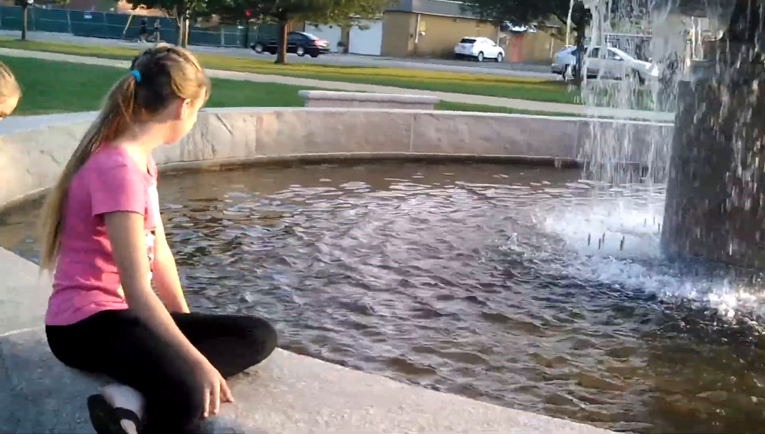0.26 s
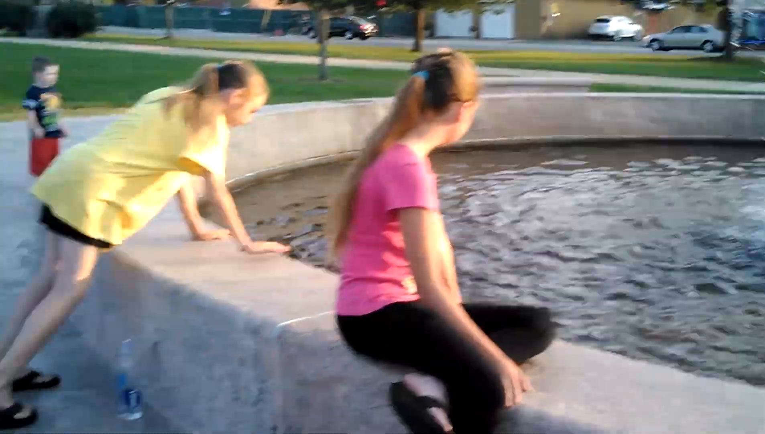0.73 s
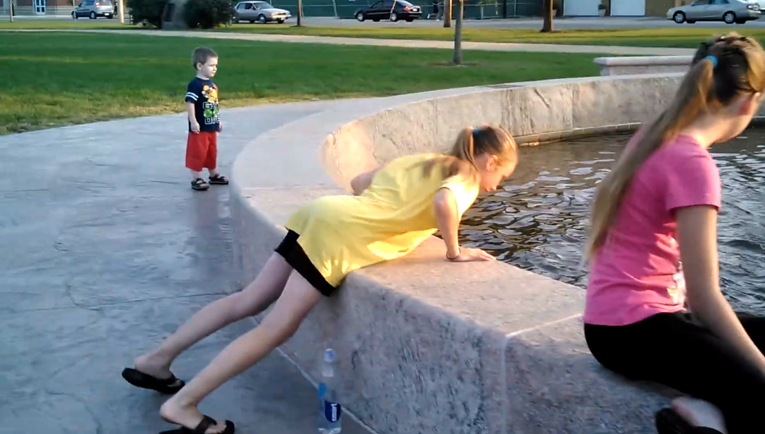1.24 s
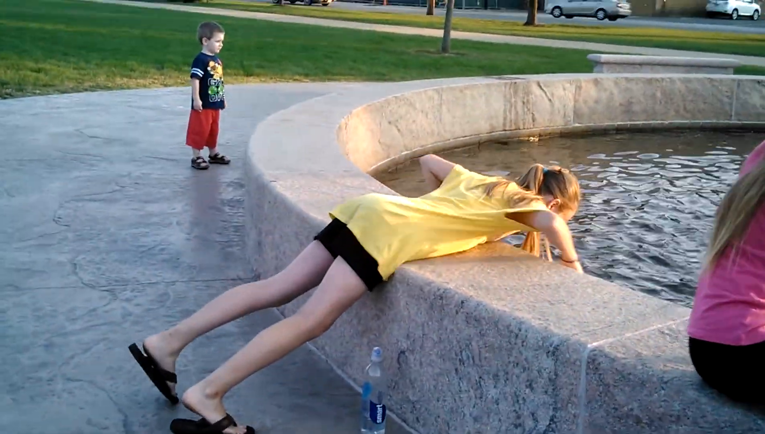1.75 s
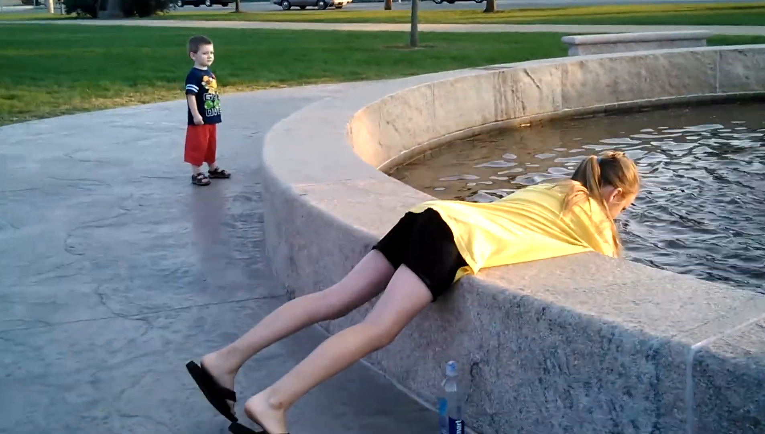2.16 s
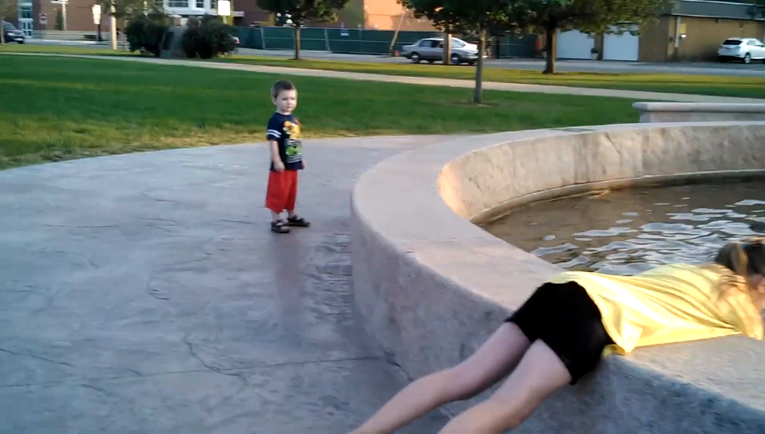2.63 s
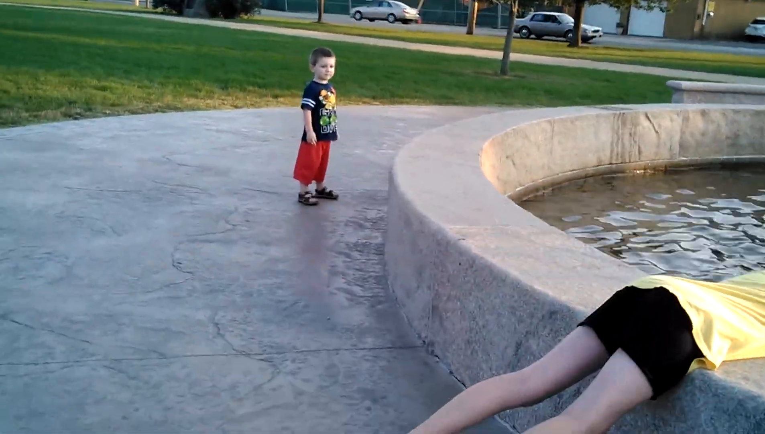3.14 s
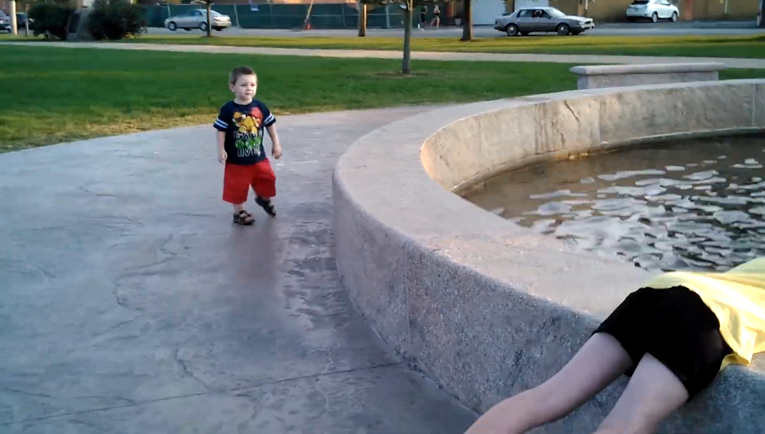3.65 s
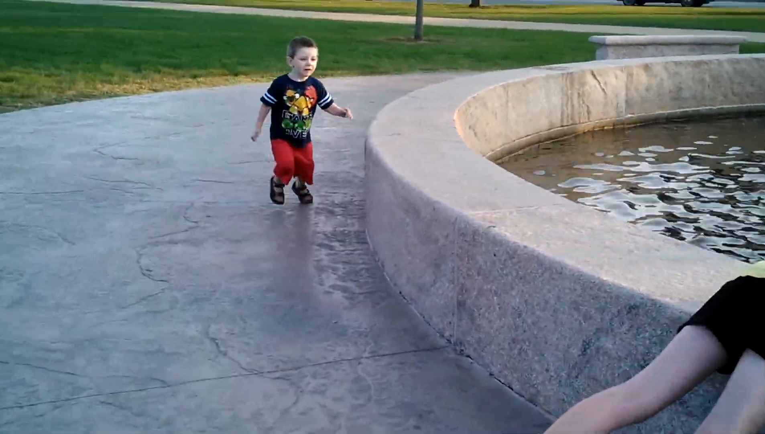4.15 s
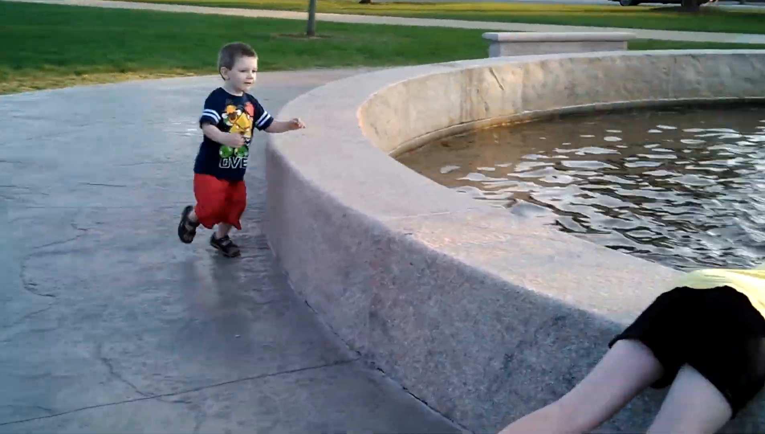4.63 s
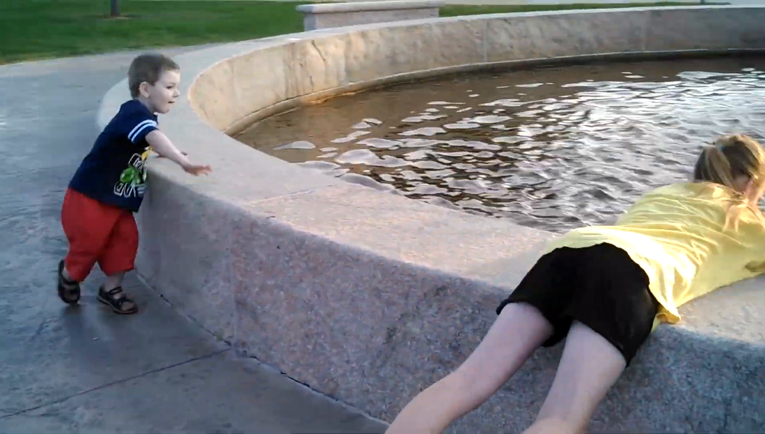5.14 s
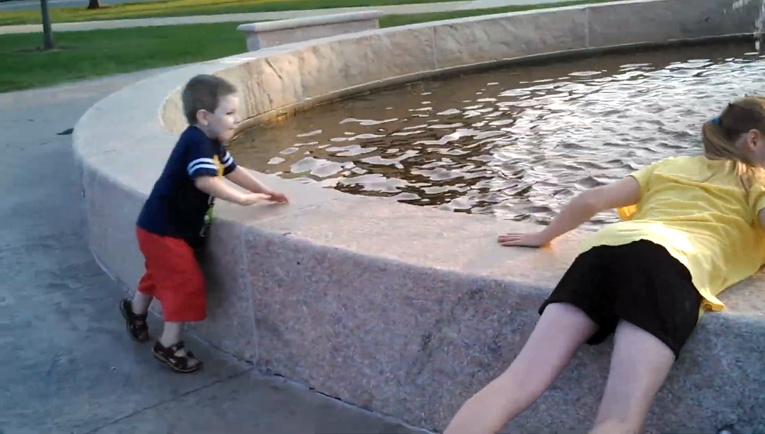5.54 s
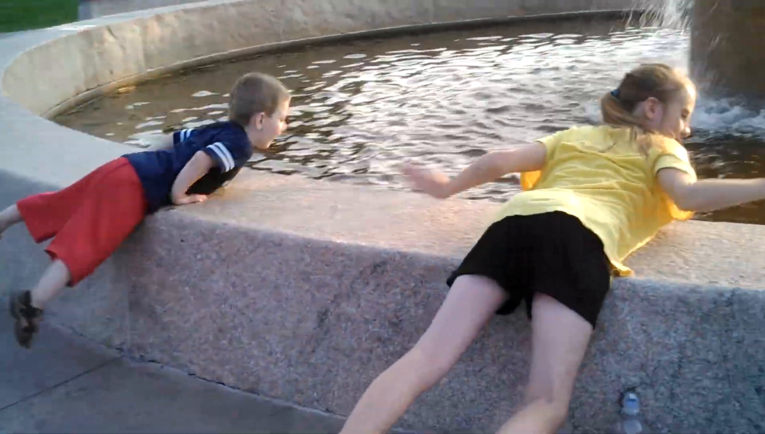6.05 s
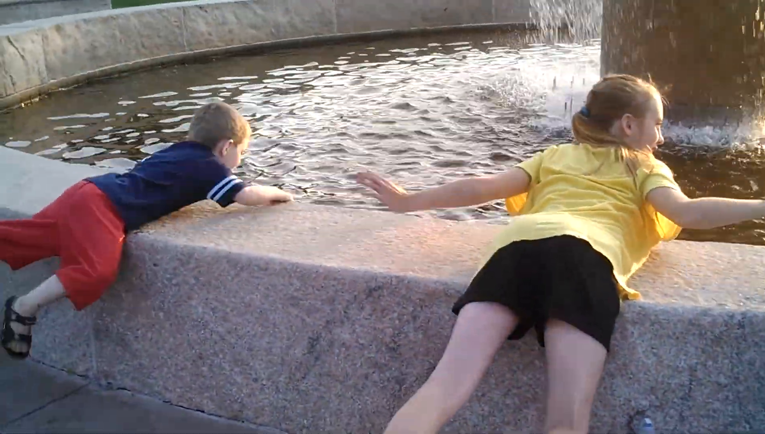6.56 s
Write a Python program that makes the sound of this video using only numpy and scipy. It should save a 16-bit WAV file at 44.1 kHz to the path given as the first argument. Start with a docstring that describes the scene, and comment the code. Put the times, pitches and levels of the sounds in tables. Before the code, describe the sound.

A park fountain splashes without pause into a stone basin a few metres away, in open air. The rush is bright and hissy, peaking around 6 kHz, made of dense noise with fine fizz, patter and faint gurgling. From 0 to 2 s it is full, with short rising plops near 0.1, 0.2, 0.6 and 0.8 s, a small tick at 0.6 and a low wind bump at the very start. Around 2.1 s come more tiny drops and a faint tick. From 2.3 to 4 s the water drops a few decibels as the microphone turns away; wind buffets it in low lumps, strongest with flutter at 2.8-3 s, with further throbs to 4.7 s. The splash grows again, fullest near 5.2 s and at the end. Sharp dry clicks strike at 5.5 s and, as a loud pair, at 6.2 s; drops cluster near 6.4-6.5 s. Mostly mono, treble flickering sideways.

```python
"""Park fountain in a breeze

Sheets of water fall into a stone basin a few metres off: noise and swarms of damped, rising sines merge into a rush.
A few near drops plop as single bubbles; filtered clicks tick. Filtered noise in lumps is a breeze buffeting
the single microphone, whose port rings near 6 kHz. The treble flickers between the ears as bands swap for hiss.
"""
import sys
import numpy as np
from scipy import signal
from scipy.fft import rfft, irfft, next_fast_len
from scipy.io import wavfile
from scipy.ndimage import uniform_filter1d, map_coordinates

SR = 44100
rng = np.random.default_rng(int(sys.argv[2]) if len(sys.argv) > 2 else 0)


def invert_db(level):
    """Linear amplitude ratio for a level in decibels (20 dB per decade), elementwise."""
    return 10 ** (np.asarray(level, dtype=float) / 20)


def put_to_file(sound):
    """Save the sound as 16-bit audio at rate SR, in the file named by the first command-line argument."""
    columns = np.atleast_2d(sound).T  # one column per channel
    safe = np.clip(columns, -1, 1)
    whole_steps = np.round(safe * 32767)
    wavfile.write(sys.argv[1], SR, whole_steps.astype(np.int16))


N = 299439


def unit(x):
    """Scaled to rms 1."""
    return x / np.sqrt(np.mean(np.abs(x) ** 2) + 1e-20)


def along(points, hz):
    """(Hz, value) points interpolated on a log frequency axis."""
    point_hz, value = np.transpose(points)
    return np.interp(np.log(hz + 1), np.log(point_hz + 1), value)


def curves(rows, t_s):
    """Each column after the time, read at times t_s."""
    row_s, *columns = np.transpose(rows)
    return [np.interp(t_s, row_s, column) for column in columns]


def wobble(rate_hz):
    """A smooth random curve with rate_hz knots a second."""
    knots = rng.standard_normal(N)
    return map_coordinates(knots, [np.arange(N) * rate_hz / SR])


def coloured(x, spectrum):
    """x through a causal minimum-phase filter with the given (Hz, dB) gain."""
    m = 2 * next_fast_len(N // 2 + 4096)
    gain = invert_db(along(spectrum, np.fft.rfftfreq(m, 1 / SR)))
    cepstrum = irfft(np.log(gain + 1e-6), m)
    # fold onto positive time
    cepstrum[1:m // 2] *= 2
    cepstrum[m // 2 + 1:] = 0
    response = np.exp(rfft(cepstrum))
    return irfft(rfft(x, m) * response, m)[:N]


def bubbles(start_s, size, hz, cycles, rise):
    """Damped sines whose pitch climbs as each bubble nears the surface."""
    t_s = np.arange(600) / SR
    age = t_s * (hz / cycles)[:, None]  # in decay times
    tone = np.sin(2 * np.pi * hz[:, None] * t_s * (1 + rise * age))
    envelope = np.exp(-age) * (1 - np.exp(-4 * age))
    ring = tone * envelope * size[:, None]
    where = (start_s * SR).astype(int)[:, None] + np.arange(len(t_s))
    return np.bincount(where.ravel(), ring.ravel(), N + len(t_s))[:N]


def swarm(count, hz, octaves, cycles, spread_db, size=1):
    """Splashes of size bubbles at random moments: log-normal pitch, many small and a few large."""
    clump_s, clump_octaves = .012, 0.207  # scatter within a splash
    total = count * size
    splash_s = rng.random(count) * N / SR
    start_s = np.repeat(splash_s, size) + clump_s * rng.exponential(size=total)
    splash_octaves = octaves * rng.standard_normal(count)
    pitch_octaves = np.repeat(splash_octaves, size) + clump_octaves * rng.standard_normal(total)
    strength = invert_db(spread_db * np.minimum(rng.exponential(size=total), 4))
    pitch_hz = np.clip(hz * 2 ** pitch_octaves, 200, 16000)
    return unit(bubbles(start_s % (N / SR), strength, pitch_hz, cycles, rise=0.113))


def water():
    """Far splashes merge into patchy noise; nearer ones stand out as fizz, patter and gurgle."""
    # strength of the falling water: time_s, level_db
    splash = [(0, -11.5), (.7, -11), (1.3, -12.5), (2.15, -12), (2.45, -14.5), (3.0, -14), (3.8, -14.5),
              (4.4, -12.5), (4.95, -13), (5.25, -11.4), (5.8, -12), (6.15, -13), (6.79, -11.5)]
    # turning of the microphone: time_s, away from the jet (0-1), back towards it (0-1)
    facing = [(0, 0, .15), (.7, 0, .15), (1.4, .3, 0), (2.7, .6, 0), (3.4, 1, 0), (4.1, .7, 0),
              (4.8, .45, .1), (5.4, 0, .55), (6.1, .1, .85), (6.79, 0, 1)]
    # colour when turned away: freq_hz, gain_db
    away_colour = [(800, 1), (2000, .5), (3700, 1.5), (4600, 1), (6000, 0), (9000, 3.5), (11500, -.5),
                   (13500, 4)]
    # colour when turned back, nearer: freq_hz, gain_db
    back_colour = [(800, -1), (2000, -.5), (3000, -1.5), (3700, -4.5), (4500, 4), (6000, 0), (7500, -2.5),
                   (9000, -5.5), (11500, 2.5), (13500, 4)]
    # water heard through the microphone port: freq_hz, relative gain_db
    port = [(190, -46), (330, -23.5), (620, -18.5), (2500, -17), (3300, -20), (4050, -23), (4600, -17.5),
            (5400, -6), (6100, 2), (7000, -6.5), (9500, -18.5), (11600, -34.5), (13000, -23.5),
            (14200, -23.5)]

    # levels relative to the far noise
    fizz = invert_db(-11.5) * swarm(count=6000, hz=6010, octaves=0.689, cycles=1.73, spread_db=3)
    gurgle = invert_db(-15.5) * swarm(count=600, hz=1491.6, octaves=0.75, cycles=7, spread_db=1.5, size=4)
    patter = invert_db(-16) * swarm(count=1600, hz=2000, octaves=.4, cycles=.8, spread_db=2.5)
    far = rng.standard_normal(N)
    hz, at_s, z = signal.stft(far + fizz + gurgle + patter, SR, nperseg=512)

    patches = uniform_filter1d(rng.standard_normal(z.shape), size=19, axis=0)
    patches = uniform_filter1d(patches, size=5, axis=1)
    patch_db = 0.69 * unit(patches)
    away, back = curves(facing, at_s)
    turn_db = np.outer(along(away_colour, hz), away) + np.outer(along(back_colour, hz), back)
    rush = signal.istft(z * invert_db(turn_db + patch_db), SR, nperseg=512)[1][:N]

    surge_db = curves(splash, np.arange(N) / SR)[0] + 0.28 * wobble(24)
    return invert_db(surge_db) * unit(coloured(rush, port))


def breeze():
    """Eddies push the membrane in lumps; smaller, faster ones throb, and strong gusts flutter higher still."""
    # buffeting: time_s, strength_db, tilt from thump to throb (dB)
    gusts = [(0, -29, -6), (.13, -27.5, 7), (.18, -38, 0), (1.2, -36, -0.5), (1.58, -32, -8),
             (1.75, -39, 0), (2.05, -35.5, 4), (2.25, -25, -2), (2.62, -24.5, 3), (2.76, -17.5, 11.5),
             (2.96, -19.5, -1.5), (3.02, -27.5, -2), (3.28, -24, 0), (3.35, -34, -7), (3.46, -25.5, 2.5),
             (3.65, -27, -7), (3.75, -31.5, 0), (4.09, -25, 1), (4.15, -37, -5), (4.29, -26, 8),
             (4.43, -28.5, 21), (4.5, -39, -3), (4.58, -28, 2), (4.72, -39.5, -4), (5.5, -37.5, -1),
             (5.75, -33, -9.5), (6.25, -34.5, -3), (6.52, -27, 0), (6.64, -37.5, 0), (6.73, -28.5, -8)]
    # eddy spectra, largest to smallest: freq_hz, relative gain_db
    thump = [(20, -71), (35, -15), (52, -3), (75, 0), (100, -2), (140, -39), (300, -64)]
    throb = [(60, -43.5), (95, -0.5), (130, -2.5), (185, -7), (260, -33), (500, -68)]
    flutter = [(120, -29), (190, 2), (280, -0.5), (380, -7), (600, -22), (1000, -65.5)]
    thump_db, throb_db = -3.5, -4.5  # over the strength
    calm_db, grows_from_db, growth_db_per_db = -46.5, -30, 1.95  # flutter

    strength_db, tilt_db = curves(gusts, np.arange(N) / SR)
    levels_db = (
        strength_db + thump_db - tilt_db / 2,
        strength_db + throb_db + tilt_db / 2,
        calm_db + growth_db_per_db * np.maximum(strength_db - grows_from_db, 0),
    )
    shared_lumps_db = 1.83 * wobble(13)
    out = np.zeros(N)
    for level_db, spectrum in zip(levels_db, (thump, throb, flutter)):
        lumps_db = shared_lumps_db + 0.97 * wobble(18)
        eddies = unit(invert_db(lumps_db) * coloured(rng.standard_normal(N), spectrum))
        out += invert_db(level_db) * eddies
    return out


def drops():
    """The bubble under each near drop rings briefly, climbing in pitch."""
    # near drops: start_s, level_db, starting pitch_hz
    near_drops = [(0.092, -6, 1400), (0.113, -9, 1100), (0.198, -6, 935), (0.609, -6, 1290),
                  (0.613, -12, 2480), (0.82, -10, 1330), (2.025, -9, 1560), (2.109, -11, 1710),
                  (2.183, -11, 2150), (3.102, -10, 2250), (4.369, -8, 1370), (4.882, -10, 2250),
                  (5.249, -8, 1670), (6.179, -10, 1370), (6.415, -10, 1900), (6.43, -8, 1250),
                  (6.503, -11, 1590)]
    decay_s = 0.0016
    start_s, level_db, pitch_hz = np.transpose(near_drops)
    cycles = np.clip(decay_s * pitch_hz, .4, 12)
    return bubbles(start_s, invert_db(level_db), pitch_hz, cycles, rise=0.092)


def ticks():
    """Sharp contacts: impulses filtered even from their lowest pitch to about 4 kHz."""
    # dry broad ticks: start_s, level_db of the peak, lowest_hz
    contacts = [(.6095, -8, 1800), (2.0895, -11, 2200), (5.5448, -2.5, 1400), (6.1782, -5, 900),
                (6.2080, -.5, 650)]
    out = np.zeros(N + 256)
    blow = np.eye(1, N)[0]  # unit impulse
    for start_s, level_db, low_hz in contacts:
        spectrum = [(low_hz / 4, -30), (low_hz, 0), (4300, 0), (6000, -9), (8500, -28)]
        tick = coloured(blow, spectrum)[:256]
        out[round(start_s * SR):][:256] += invert_db(level_db) * tick / np.abs(tick).max()
    return out[:N]


def scene():
    """One microphone feeds both channels."""
    mono = water() + breeze() + drops() + ticks()
    return np.tile(mono, (2, 1))


def flicker(x):
    """In scattered moments a treble band turns into unrelated hiss in each ear, at the same mean strength."""
    # how often the ears differ: freq_hz, share of moments (0-1)
    apart_share = [(4000, 0), (4500, .03), (5500, .07), (6100, .13), (7000, .28), (8000, 0.51),
                   (14000, 0.43)]
    frames = dict(fs=SR, window=np.sqrt(signal.get_window("hann", 2048)), nperseg=2048)
    hz, _, z = signal.stft(x, **frames)
    hiss = unit(signal.stft(rng.standard_normal(x.shape), **frames)[2])
    strength = np.sqrt(np.abs(uniform_filter1d(np.abs(z) ** 2, size=32, axis=1)))

    band = np.arange(len(hz)) // 32  # 32 bins = SR / 64 Hz
    chance = rng.standard_normal((band[-1] + 1, z.shape[2]))
    across_bands = unit(uniform_filter1d(chance, size=4, axis=0))
    across_time = unit(uniform_filter1d(chance, size=2, axis=1))
    chance = unit(chance + 1.5 * across_bands + 0.51 * across_time)
    rank = 1 / (1 + np.exp(1.7 * chance))  # roughly uniform, 0-1
    apart = rank[band] < along(apart_share, SR / 64 * (band + .5))[:, None]
    return signal.istft(np.where(apart, strength * hiss, z), **frames)[1][:, :N]


def band_limit(x):
    """A steep low-pass at the top of the band."""
    return signal.sosfilt(signal.butter(12, 15010, fs=SR, output="sos"), x)


def record(dry):
    """Preamplifier gain, rounded-off peaks, flickering treble and a band limit."""
    gain_db, ceiling, top_hz = 0.66, 1.04, 14260
    hot = invert_db(gain_db) * dry
    rounded = hot / (1 + np.abs(hot / ceiling) ** 8) ** (1 / 8)
    x = flicker(rounded)
    m = next_fast_len(N)
    passed = np.fft.rfftfreq(m, 1 / SR) < top_hz
    x = irfft(rfft(x, m) * passed, m)[:, :N]
    return band_limit(np.clip(x, -1, 1))


dry = scene()
out = record(dry)
put_to_file(out)
```